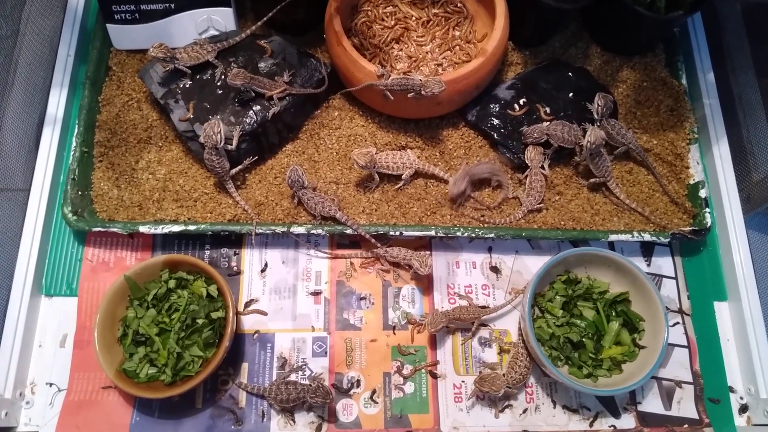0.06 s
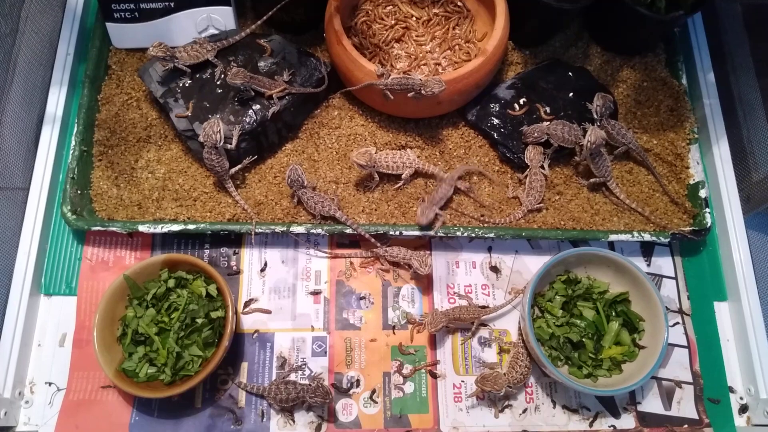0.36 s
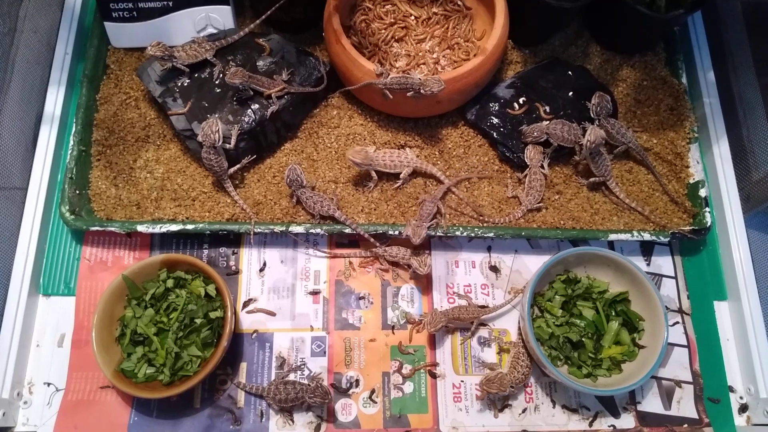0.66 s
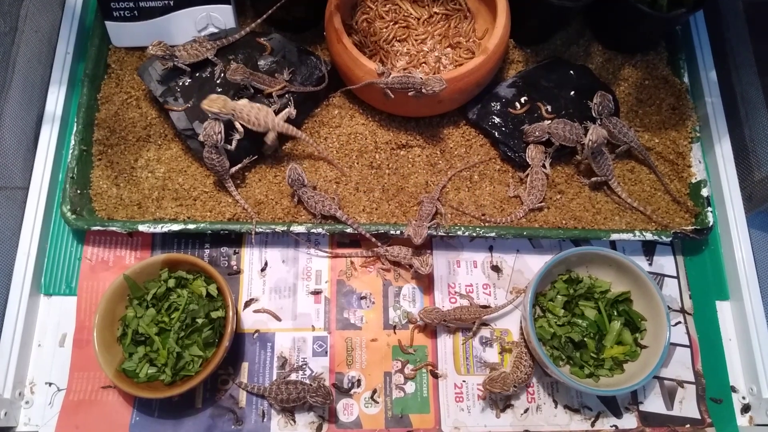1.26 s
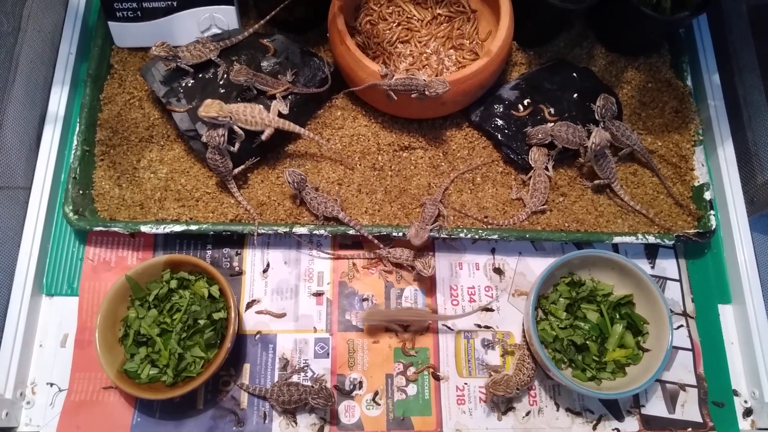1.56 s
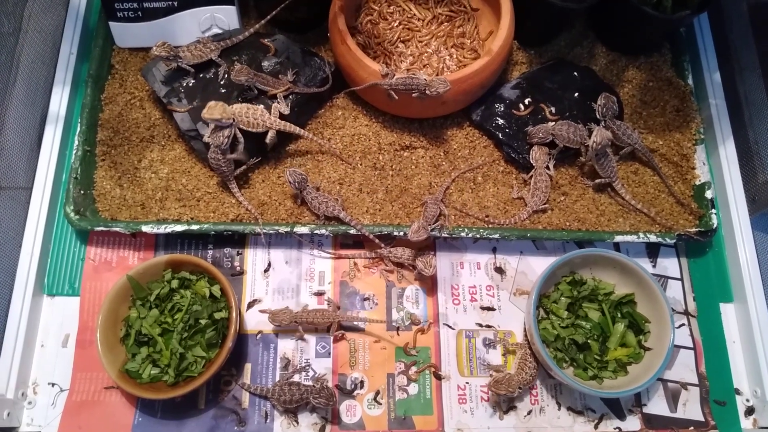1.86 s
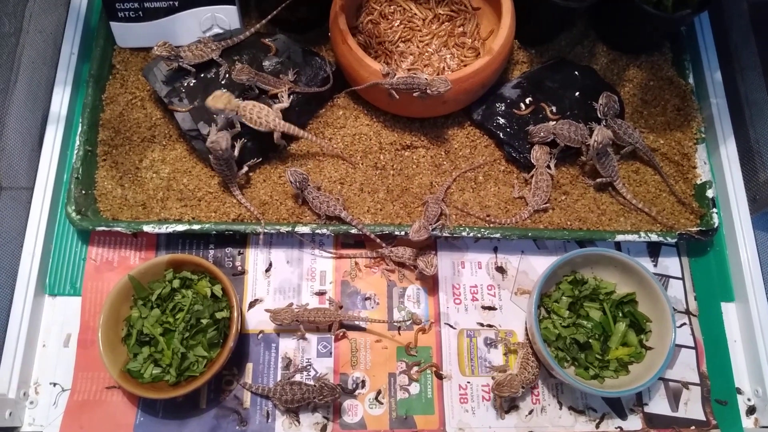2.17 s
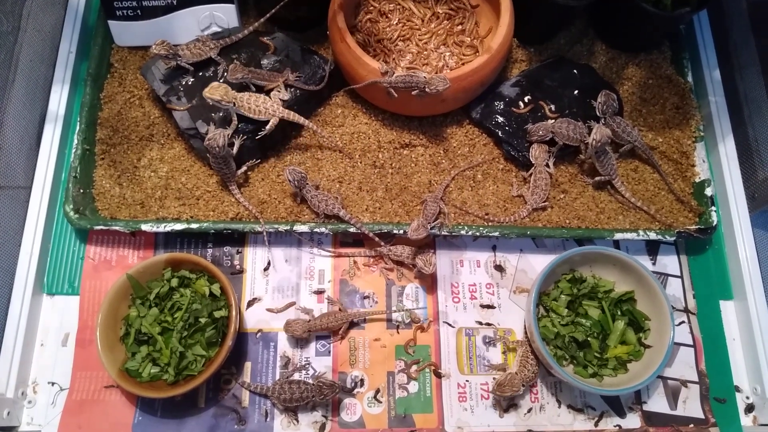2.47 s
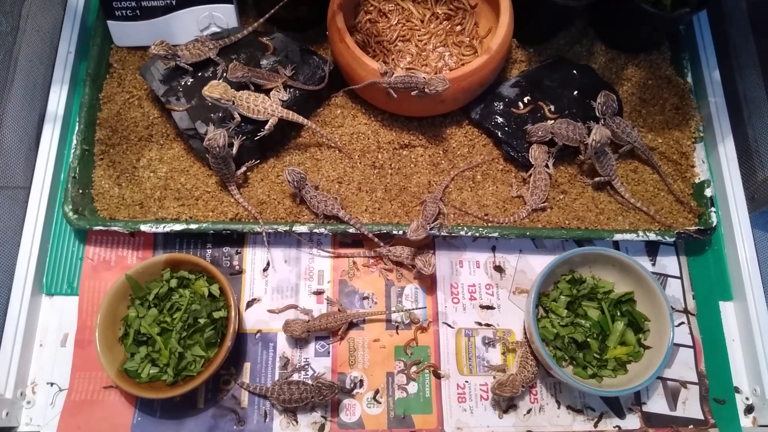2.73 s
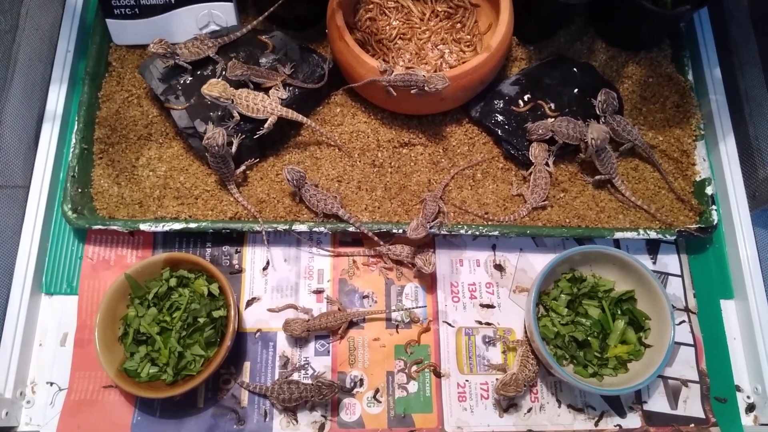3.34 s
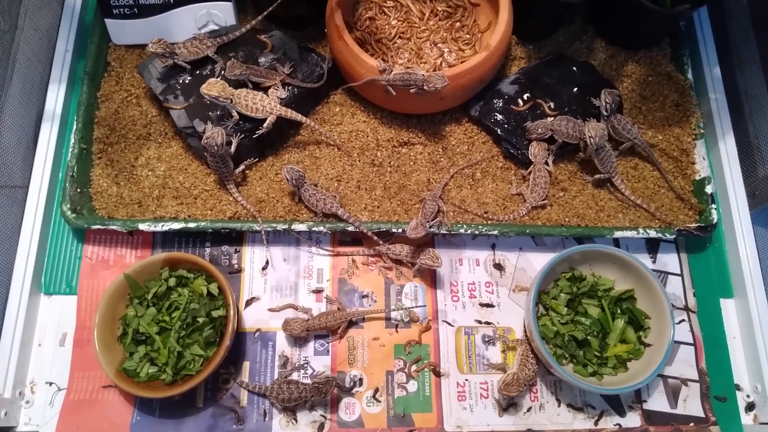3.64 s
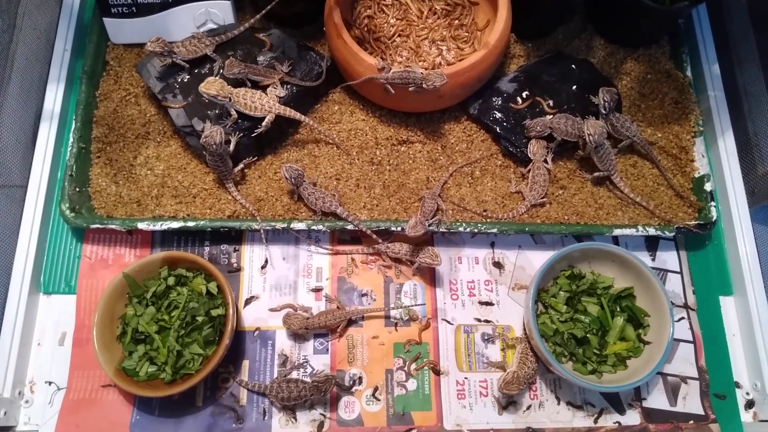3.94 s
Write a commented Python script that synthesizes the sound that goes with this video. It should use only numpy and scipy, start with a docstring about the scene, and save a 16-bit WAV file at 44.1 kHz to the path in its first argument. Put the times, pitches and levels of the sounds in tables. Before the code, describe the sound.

Quiet, dry scuffing of little lizards crossing paper and sand comes in short strokes, mixed with brief squeaks, hisses and claw scratches. A low hum and rumble fill the room throughout, growing louder near the end alongside a muffled rustle.

```python
"""Small lizards shuffle over newspaper and sand in an indoor enclosure. A low room hum is there from the
start. Almost at once a dry rub sets in, in strokes that ease in and stop short; the sliding contact rings
in half-sung squeaks or opens into a bright hiss, and sand ticks faintly. Sharp scratches come now and
then, loudest just before 2 s. In the second half a soft, dull rustle grows, and the hum swells to the end."""
import sys
import numpy as np
from scipy import signal
from scipy.fft import rfft, irfft
from scipy.io import wavfile

SR = 44100
rng = np.random.default_rng(int(sys.argv[2]) if len(sys.argv) > 2 else 0)


def master(y):
    """Save y as 16-bit WAV."""
    cut = np.clip(np.atleast_2d(y).T, -1, 1)
    pcm = np.round(cut * 32767)  # scale
    wavfile.write(sys.argv[1], SR, pcm.astype(np.int16))


N = 176400  # 4 seconds


# Each slide of a body over the floor:
# (start [s], end [s], fade-in [s], relative level at start [dB], relative level at end [dB])
SLIDES = [(0.146, 0.212, .03, -75, -66), (0.207, 0.532, 0.046, -66.5, -65),
          (0.576, 0.638, 0.031, -66, -73.5), (0.643, 0.669, .01, -74, -78),
          (0.843, 0.955, 0.066, -74, -67.5), (1.004, 1.275, 0.062, -66.5, -66.5),
          (1.276, 1.32, 0.011, -80, -70), (1.351, 2.695, 0.074, -64.5, -62.5),
          (2.781, 3.113, 0.065, -60, -63), (3.163, 3.934, 0.046, -62.5, -61.5),
          (3.952, 4.058, 0.047, -62, -61)]
def strokes():
    """Each slide eases in and stops short. Gives the contact (0 to 1) and the rubbing strength."""
    t, contact, strength = clock(), 0, 0
    stop_s = 0.014
    for start, end, attack, first_db, last_db in SLIDES:
        fade_in = np.clip((t - start) / attack, 0, 1) ** 0.89
        touch = fade_in * np.clip((end - t) / stop_s + .5, 0, 1)
        contact = contact + touch
        strength = strength + touch * undb(np.interp(t, [start, end], [first_db, last_db]))
    return np.minimum(contact, 1), strength


# The tone of the rub, from low to high: (frequency [Hz], relative level [dB])
RUB_TONE = [(500, 1), (900, -4.5), (1200, -3.5), (1700, -3), (2300, -1), (3200, 2), (4200, -3),
            (5200, -9.5), (7000, -17), (9000, -14.5), (10500, -28), (12000, -31.5), (15500, -42.5)]
# Borders of the bands that flicker separately: (frequency [Hz])
RUB_BAND_EDGES = [0, 1500, 2200, 2800, 3400, 4100, 4900, 5800, 7000, 8500, 23000]
# How far the rub's treble is turned up or down: (time [s], gain [dB])
RUB_BRIGHTNESS = [(0, -14), (.55, 1.5), (.95, 3.5), (1.25, -3.5), (1.45, -0.5), (2.1, 0.5), (2.4, 0.5),
                  (2.85, 3), (3.05, 0.5), (3.35, -2.5), (3.6, 2), (3.8, -3), (4, 7)]
def rub():
    """Tiny slips blur into a dry rub; its bands flicker as the surface changes."""
    f, rubbing = bins(), 0
    flicker_db, flicker_hz, treble_hz = 1.5, 24, 4500
    spectrum = rfft(shaped(grains(), undb(over_hz(RUB_TONE))))
    for low, high in zip(RUB_BAND_EDGES, RUB_BAND_EDGES[1:]):
        band = irfft(spectrum * (f >= low) * (f < high), N)
        rubbing = rubbing + band * undb(flicker_db * wobble(flicker_hz))
    body = irfft(rfft(rubbing) / (1 + (f / treble_hz) ** 20), N)
    treble = (rubbing - body) * undb(over_time(RUB_BRIGHTNESS)[0])
    flutter = undb(0.1 * wobble(rate_hz=54))
    return (body + treble) * flutter * pan(db=-2.5)


# Half-sung squeaks; a narrow band sounds more like a note:
# (middle [s], length [s], pitch [Hz], band width [Hz], relative level [dB])
SQUEAK_NOTES = [(.195, .05, 3660, 600, -75.5), (0.243, 0.0086, 4000, 895, -61.5),
                (0.267, 0.044, 4420, 500, -72), (0.288, 0.083, 2864, 500, -65),
                (.305, 0.038, 3580, 250, -66.5), (0.312, 0.081, 5810, 200, -78),
                (0.324, .05, 3315, 110, -59), (0.382, 0.0598, 3310, 100, -64),
                (0.436, 0.061, 3250, 600, -66), (0.628, .04, 5600, 900, -80.5),
                (1.18, 0.078, 3640, 150, -66.5), (1.189, .16, 3040, 806, -69),
                (1.308, 0.027, 2983, 600, -72), (1.535, .07, 3270, 150, -64.5),
                (1.571, 0.079, 2890, 250, -63.5), (1.578, .07, 2510, 200, -66),
                (1.598, 0.095, 3680, 220, -65.5), (1.72, 0.059, 3210, 150, -64.5),
                (1.792, 0.046, 2455, 130, -62.5), (1.799, 0.095, 2800, 129, -62),
                (1.952, .08, 2596, 150, -65.5), (2.004, 0.057, 3520, 260, -60.5),
                (2.045, 0.054, 3320, 220, -61), (2.027, .08, 2780, 128, -65),
                (2.436, 0.07, 3950, 600, -67.5), (2.949, 0.077, 4000, 400, -66.5),
                (2.981, .032, 5080, 240, -63.5), (3.038, 0.049, 4160, 600, -69),
                (3.061, 0.056, 4990, 169, -66.5), (3.077, 0.049, 2330, 179, -68.5),
                (3.194, .05, 5020, 500, -73.5), (3.223, 0.055, 2880, 200, -70.5),
                (3.294, 0.064, 2590, 200, -65.5), (3.308, 0.078, 3190, 450, -68.5),
                (3.363, .12, 4950, 500, -78), (3.409, 0.051, 2774, 129, -63),
                (3.469, 0.045, 3210, 280, -58.5), (3.48, 0.058, 3780, 200, -65),
                (3.496, 0.09, 2875, 300, -62.5), (3.54, .05, 3410, 320, -59.5),
                (3.601, 0.052, 3990, 700, -67.5), (3.657, 0.044, 5340, 700, -69.5),
                (3.677, 0.056, 6060, 800, -69)]
def squeaks():
    """Slips make the contact ring, often at several pitches at once, and flutter as it catches."""
    out = 0
    wavering_time = np.cumsum(1 + 0.00392 * wobble(rate_hz=25.1)) / SR  # bends all pitches together
    for middle, length, hz, width, db in SQUEAK_NOTES:
        near = abs(clock() - middle) < 2 * length
        smoothing = signal.butter(2, width / 2, fs=SR, output="sos")
        slips = unit(signal.sosfilt(smoothing, rng.standard_normal((4, SR))))
        # Slow noise times a tone gives a narrow band of noise around that pitch.
        cos_part, sin_part = slips[:, SR - near.sum():].reshape(2, 2, -1)
        phase = 2 * np.pi * hz * wavering_time[near]
        ring = np.zeros((2, N))
        ring[:, near] = cos_part * np.cos(phase) + sin_part * np.sin(phase)
        out = out + ring * swell(middle, length) * undb(db)
    flutter_db = -0.5 * wobble(rate_hz=70)
    return out * undb(flutter_db + 4.5) * pan(db=-2)


# Swells of bright hiss as a slide quickens:
# (middle [s], length [s], centre [Hz], band width [share of centre], relative level [dB])
HISS_SWELLS = [(0.302, 0.077, 5800, 0.51, -75), (0.477, 0.068, 6300, 0.38, -74),
               (0.915, 0.076, 6560, 0.33, -73), (1.091, 0.092, 6400, 0.34, -68),
               (1.444, 0.052, 5280, 0.37, -65), (1.554, 0.052, 5100, 0.42, -60.5),
               (1.67, 0.07, 4570, 0.34, -67.5), (1.88, 0.041, 6500, 0.37, -64.5),
               (1.929, 0.079, 7230, .25, -61), (2.245, 0.073, 6700, .3, -64), (2.396, 0.13, 5300, .45, -67),
               (2.653, 0.049, 7000, 0.57, -67.5), (2.853, 0.13, 6100, 0.29, -63.5),
               (3.767, 0.053, 6760, 0.29, -64.5), (3.878, 0.05, 6400, 0.29, -69)]
def hisses():
    """Faster slips stir a wide, high band of sound."""
    f, slips, out = bins(), grains(), 0
    bottom_hz, top_hz = 3000, 9380
    edge_cut = (1 + (f / top_hz) ** 26) * (1 + (bottom_hz / f) ** 6)
    for middle, length, hz, width, db in HISS_SWELLS:
        off_centre_cut = 1 + ((f / hz - hz / f) / width) ** 2
        hiss = shaped(slips, 1 / np.sqrt(off_centre_cut * edge_cut))
        out = out + hiss * swell(middle, length) * undb(db + 3)
    return out * pan(db=-1.5)


# Sharp scratches: (start [s], length [s], relative level [dB])
SCRATCH_BURSTS = [(0.297, .005, -70), (0.314, 0.0073, -66), (0.327, 0.017, -70.5), (0.429, .014, -73.5),
                  (0.859, .006, -78), (1.547, 0.017, -63), (1.639, 0.0048, -60), (1.646, 0.0099, -54),
                  (1.715, 0.022, -63.5), (1.778, 0.0062, -57), (1.786, 0.013, -57.5), (1.84, 0.0089, -60),
                  (2.904, 0.013, -62), (3.229, .005, -70), (3.6, 0.015, -68.5)]
# The bright tone of scratches and sand ticks: (frequency [Hz], relative level [dB])
TICK_TONE = [(1500, -37), (3500, -10), (4700, -3.5), (6000, -5), (7500, -8.5), (9200, -7.5), (11000, -27),
             (15500, -25)]
def scratches():
    """Short bursts of noise, like a claw catching on paper."""
    force, rise_s = 0, 0.0023
    for start, length, db in SCRATCH_BURSTS:
        age = np.maximum(clock() - start, 0)
        force = force + undb(db + 6) * np.minimum(age / rise_s, 1) * np.exp(-(age / length) ** 2.5)
    noise = wall_echoes(rng.standard_normal((2, N)))
    return force * shaped(noise, undb(over_hz(TICK_TONE))) * pan(db=-5)


def sand():
    """Single grains tick faintly under the feet."""
    ticks_per_s, spread_db = 45, 7.5
    hits = rng.random(N) < ticks_per_s / SR
    sizes = undb(spread_db * np.minimum(rng.exponential(size=N), 3))
    return shaped(wall_echoes(hits * sizes), undb(over_hz(TICK_TONE))) * undb(-89)


# The muffled tone of the rustle: (frequency [Hz], relative level [dB])
RUSTLE_TONE = [(80, -38), (250, -20), (450, 8), (700, 1.5), (1000, -0.5), (1400, -8.5), (2500, -19.5),
               (5000, -54)]
# How loud the rustle is: (time [s], level [dB])
RUSTLE_LEVEL = [(0, -83.5), (1.3, -85), (2.15, -67), (2.45, -59), (2.75, -61), (2.97, -52), (3.15, -59.5),
                (3.4, -55), (4, -58.5)]
def dull_rustle():
    """Muffled tiny slips make a soft rustle that grows in the second half."""
    return shaped(grains(), undb(over_hz(RUSTLE_TONE))) * undb(over_time(RUSTLE_LEVEL)[0])


# The low tones of the hum:
# (pitch [Hz], relative level at start [dB], relative level at end [dB], waver [share of pitch])
HUM_TONES = [(24.1, -49, -44, 0.012), (44, -50, -43.5, 0.0074), (99.67, -55, -53.5, 0.0193),
             (113.9, -63, -38, 0.0059), (269.6, -64.5, -58, 0.0077), (348.7, -69.5, -63, 0.00805),
             (380.7, -66.5, -55, 0.01174)]
def hum():
    """Low tones waver in pitch and grow louder, mostly near the end."""
    growth, out = (np.arange(N) / N) ** 3.8, 0
    for hz, first_db, last_db, waver in HUM_TONES:
        pitch = hz * (1 + waver * wobble(rate_hz=3.92))
        tone = unit(np.sin(2 * np.pi * np.cumsum(pitch) / SR))
        out = out + tone * undb(first_db + (last_db - first_db) * growth)
    return out


# The deep tone of the room's rumble: (frequency [Hz], relative level [dB])
RUMBLE_TONE = [(15, -9), (34, -18.5), (47, -4), (57, 1.5), (70, -7.5), (85, -4), (102, 0), (130, -1.5),
               (152, -12), (220, -17), (280, -14), (325, -19.5), (385, -16), (460, -22), (560, -26.5),
               (800, -34), (1100, -44.5), (1500, -55), (3200, -55), (6000, -64.5), (10000, -71),
               (15500, -70)]
# How alike the rumble is in both ears: (frequency [Hz], likeness [0 to 1])
RUMBLE_LIKENESS = [(30, .97), (110, .94), (300, .78), (600, .25), (1200, 0)]
# How the rumble rises and falls: (time [s], gain of the bass [dB], gain of the rest [dB])
RUMBLE_SWELLS = [(0, -2.5, -1.5), (.25, -0.5, -1.5), (.8, 2, -1.5), (1.15, -7, 0.5), (1.7, -0.5, -0.5),
                 (2.2, -2.5, -1), (2.45, 4, 1.5), (2.95, -3, 1), (3.3, 2, 2.5), (3.9, 5, 2.5), (4, 7.5, 3)]
# Which side rumble and hum lean to: (frequency [Hz], left minus right [dB])
ROOM_LEAN = [(30, -1.3), (70, -2), (125, -3.6), (270, .5), (600, -1)]
def room():
    """The room's booming rumble, nearly alike in both ears in the bass, joined by the hum."""
    rumble_db, bass_top_hz = -42, 134
    opposite = np.array([[1], [-1]])  # plus on the left, minus on the right
    likeness = over_hz(RUMBLE_LIKENESS)
    shared, side = rfft(rng.standard_normal((2, N)))
    spectrum = shared * np.sqrt(1 + likeness) + side * np.sqrt(1 - likeness) * opposite
    rumble = unit(irfft(spectrum * undb(over_hz(RUMBLE_TONE)), N)) * undb(rumble_db)
    bass = irfft(rfft(rumble) / (1 + (bins() / bass_top_hz) ** 6), N)
    bass_db, rest_db = over_time(RUMBLE_SWELLS)
    out = bass * undb(bass_db) + (rumble - bass) * undb(rest_db) + hum()
    return irfft(rfft(out) * undb(opposite * over_hz(ROOM_LEAN) / 2), N)


def wall_echoes(x, count=14, span_s=.011, echo_db=-5):
    """Quick echoes off the enclosure's walls colour the sound, a little differently in each ear."""
    echoes, gain = 0, undb(echo_db)
    for when, left, right in rng.random((count, 3)):
        delay_s = .001 + span_s * when + .00004 * np.array([[left], [right]])
        echoes = echoes + np.sign(left - .5) * np.exp(-2j * np.pi * bins() * delay_s)
    return irfft(rfft(x) * (1 + gain * echoes / np.sqrt(count)), N) / np.sqrt(1 + gain ** 2)


def grains(slips_per_s=9000, spread_db=2):
    """A crowd of tiny slips of uneven size, scattered differently to each ear."""
    hits = rng.random((2, N)) < slips_per_s / SR
    signs = rng.choice([-1, 1], (2, N))
    return unit(hits * signs * undb(spread_db * rng.exponential(size=(2, N))))


def undb(db):
    """Turn decibels into a number to multiply by."""
    return 10 ** (np.asarray(db) / 20)


def unit(x):
    """Scale to an average power of 1."""
    return x / np.sqrt(np.mean(x ** 2))


def clock():
    """The time of every sample, in seconds."""
    return np.arange(N) / SR


def bins():
    """The frequency of every slot in the spectrum, at least 1 Hz."""
    return np.maximum(np.fft.rfftfreq(N, 1 / SR), 1)


def over_hz(points):
    """Join (frequency, value) points into a curve, giving each octave equal room."""
    hz, value = np.array(points).T
    return np.interp(np.log(bins()), np.log(hz), value)


def over_time(rows):
    """Join (time, values...) rows into one curve per value column."""
    times, *columns = np.array(rows).T
    return [np.interp(clock(), times, column) for column in columns]


def shaped(x, gain):
    """Turn each frequency up or down, then scale to a power of 1."""
    return unit(irfft(rfft(x) * gain, N))


def pan(db):
    """Left and right gains, db apart; below zero leans right."""
    return undb(np.array([[db], [-db]]) / 2)


def wobble(rate_hz):
    """A smooth random wiggle, about 1 in size."""
    return shaped(rng.standard_normal(N), np.exp(-(bins() / rate_hz) ** 2))


def swell(middle, length):
    """A smooth rise and fall that stays above half power for the given length."""
    return 2 ** (-2 * np.minimum(((clock() - middle) / length) ** 2, 20))


def scene():
    """Mix it all; rub, squeaks, hiss and sand sound only while the surfaces touch."""
    contact, strength = strokes()
    rubbing = strength * undb(2.5) * wall_echoes(rub())
    contact_sounds = contact * (squeaks() + wall_echoes(hisses()) + sand())
    return rubbing + contact_sounds + scratches() + dull_rustle() + room()


def record(dry):
    """Fade both ends quickly and cut the highest treble."""
    fade_s, top_hz = .003, 15700
    fade = np.minimum(np.minimum(clock(), clock()[::-1]) / fade_s, 1)
    return signal.sosfilt(signal.ellip(10, .1, 70, top_hz, fs=SR, output="sos"), dry * fade)


dry = scene()
out = record(dry)
master(out)
```